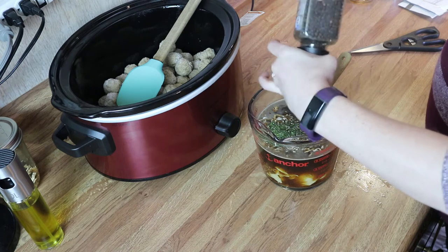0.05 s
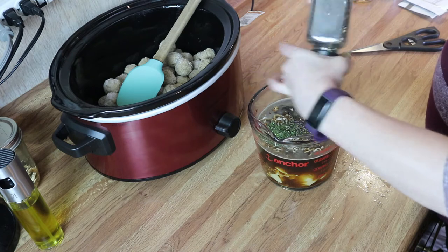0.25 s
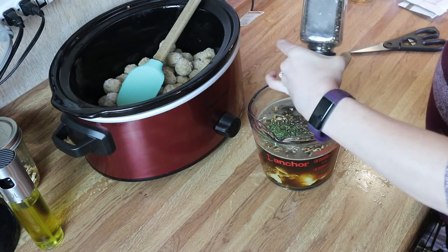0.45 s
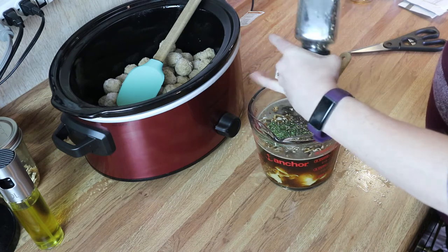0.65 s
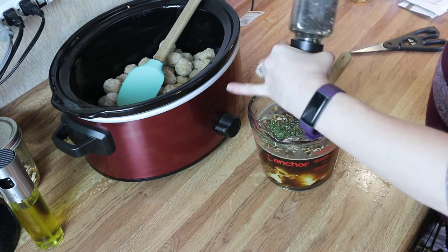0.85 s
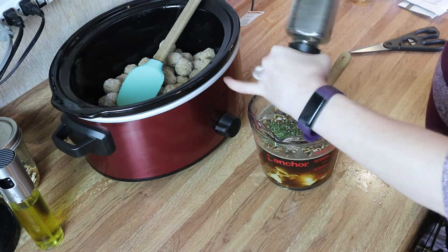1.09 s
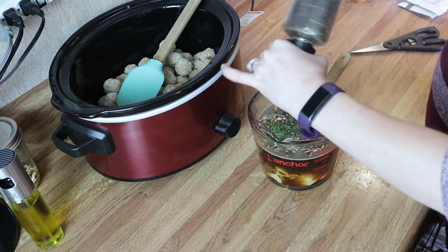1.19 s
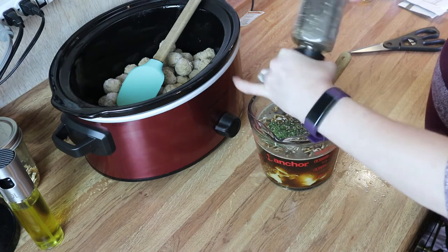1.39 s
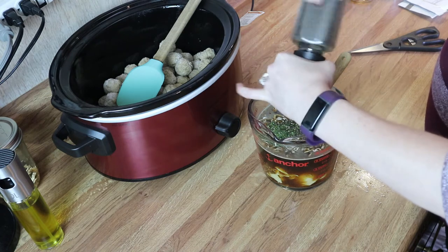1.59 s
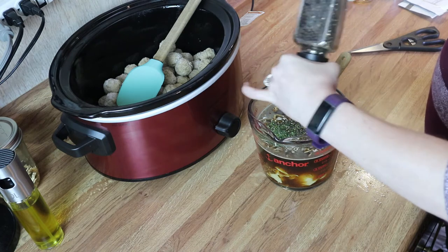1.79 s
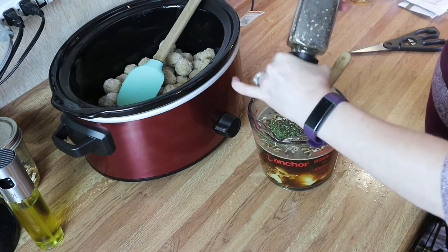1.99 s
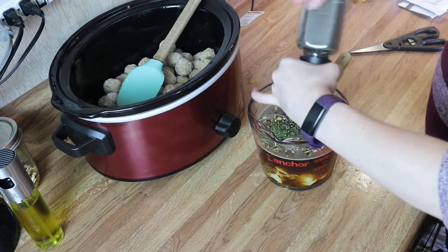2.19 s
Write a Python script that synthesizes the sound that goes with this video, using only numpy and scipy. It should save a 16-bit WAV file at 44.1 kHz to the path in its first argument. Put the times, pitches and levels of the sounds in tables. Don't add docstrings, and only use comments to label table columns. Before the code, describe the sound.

A plastic pepper grinder, close up in a small kitchen. A faint rasp and ticks lead to a loud double crunch at 0.2 s and a lone crack near 0.35. After a pause with one bright click at 0.65, a long crackling grind runs from 1.0 to 1.4. Lighter scraping follows at 1.5, harder cracks from 1.7 to 2.0, then a faint closing scrape. Low hum and air dip after loud cracks.

```python
import sys
import numpy as np
from scipy import signal
from scipy.fft import rfft, irfft, next_fast_len
from scipy.io import wavfile
from scipy.ndimage import uniform_filter1d, map_coordinates

SR = 44100
rng = np.random.default_rng(int(sys.argv[2]) if len(sys.argv) > 2 else 0)


def wav_record(signal):
    frames = np.transpose(np.atleast_2d(signal))
    bounded = np.clip(frames, -1, 1)
    quanta = np.round(bounded * 32767).astype(np.int16)
    wavfile.write(sys.argv[1], SR, quanta)


def voltage_ratio(level):
    return 10 ** (np.asarray(level, float) / 20)


N = 99225


def unit(x):
    return x / np.sqrt(np.mean(x ** 2) + 1e-20)


def along(points, hz):
    f, value = np.transpose(points)
    return np.interp(np.log(hz + 1), np.log(f + 1), value)


def filtered(x, response):
    m = next_fast_len(x.shape[-1] + 8192)
    spectrum = rfft(x, m) * response(np.fft.rfftfreq(m, 1 / SR))
    return irfft(spectrum, m)[..., :x.shape[-1]]


def ring(f, hz, width):
    return 1j * f * width / (hz * hz - f * f + 1j * f * width)


def swell(t, hz, peak_s):
    u = np.clip(t, 0, 1) / (peak_s + 1e-4)
    return u * np.exp((1 - u ** 2) / 2) * np.sin(2 * np.pi * (hz * t + rng.random()))


# frequency in Hz, width in Hz, level in dB.
BODY_MODES = [(1110, 50, -14), (2310, 90, -10.5), (3120, 17, -1), (3780, 38, 2), (4360, 32, -2),
              (4810, 26, -1.5), (5490, 130, -5), (6020, 12, 2.5), (6600, 240, -33), (10820, 380, -1)]


def mill(f, levels_db):
    response = 1
    for (hz, width, db), extra_db in zip(BODY_MODES, levels_db):
        response = response + voltage_ratio(db + extra_db - 3.5) * ring(f, hz, 0.5 * width + 150)
    return response


# frequency in Hz, level in dB per Hz.
BREAK_COLOUR = [(180, -45), (300, -7), (814, -13), (1140, -8.5), (2840, -7.5), (4370, -5), (7570, -9.5),
                (10900, -12.5), (16000, -21)]


def crack(db, hz, tilt_db, ms):
    before = 64
    t = np.arange(2048) / SR - before / SR
    length = ms / 1000 + 1e-5
    rise = 1 - np.exp(-np.clip(t, 0, 1) / (0.18 * length))
    sag_db = 9 * np.clip(t / length, 0, 1)
    fade_db = 60 * np.clip(t - length, 0, 1) / 0.007
    splinter = rng.standard_normal(len(t)) * rise * voltage_ratio(-sag_db - fade_db)
    modes_db = rng.normal(0, 3.5, len(BODY_MODES))
    thin_db = max(tilt_db - 2.5, 0)
    own_ring_db = np.array([[0], [-6]])

    def colour(f):
        slope_db = np.where(f > 4000, tilt_db, 2 * thin_db)
        slope_db = slope_db * np.log2((f + 1) / 4000).clip(-1, None)
        low_cut = 1 / (1 + (963 / (f + 1)) ** 8)
        body = mill(f, modes_db) + voltage_ratio(own_ring_db) * ring(f, hz, hz / 5.5) ** 2
        return voltage_ratio(along(BREAK_COLOUR, f) + slope_db) * low_cut * body

    hit, send = filtered(np.array([splinter, t == 0]), colour)
    clean = min(0.003 / length, 1)
    tone = voltage_ratio(-9) * clean * swell(t, hz, 0.55 * length)
    hit = voltage_ratio(db) * (voltage_ratio(-1) * hit / abs(hit).max() + tone)
    send = send * np.linalg.norm(hit) / np.linalg.norm(send)
    return hit, voltage_ratio(0.99 * thin_db) * send


# start in seconds, peak in dB, own ring in Hz, brightness in dB per octave, break length in ms.
CRUNCH_HITS = [
    (.2017, -10, 3900, -5, 4),
    (.2101, 1, 4560, 2, 2.4),
    (.2145, -11, 4300, 1, 7),
    (.2255, -4.5, 4600, -7, 2.6),
    (.2308, -3, 4820, -2, 3),
    (.2358, -5, 4520, -8, 3.2),
]
STRAY_CORNS = [
    (0.125, -26, 6500, 8, 3),
    (0.157, -28, 11100, 6, 4),
    (0.167, -26, 2750, -4, 2.3),
    (0.3568, -4, 3150, -4.5, 1.8),
    (0.951, -41, 2500, -12, 3),
]
GRIND_CORNS = [(.99, -24, 4700, -4, 4), (1.0097, -7, 3050, -1, 2.2), (1.021, -21, 3050, -3, 6),
               (1.047, -26, 3800, -3, 5), (1.1415, -20, 2400, 0, 7), (1.1546, -3, 4300, -2, 2.5),
               (1.161, -11, 4200, -3, 5), (1.1675, -13, 4300, 0, 6), (1.184, -4, 4260, -6, 3.4),
               (1.2035, -2.5, 4260, -3, 3), (1.209, -11, 4240, -1, 7), (1.2218, -4, 4350, 2, 2.5),
               (1.2298, -4.5, 5600, -2, 3), (1.2438, -10, 4300, -4, 2.5), (1.2677, -12, 4500, -2, 2.5),
               (1.2712, -12, 4090, -3, 4), (1.2822, -8, 4270, 0, 2.2), (1.3016, -14, 4300, -4, 2.2),
               (1.314, -19, 4400, -6, 6), (1.3345, -15, 3900, -1, 6)]
CAP_SNAPS = [
    (0.3512, -10.5, 5730, 5, 2.6),
    (0.6507, -7, 5990, 5.5, 2),
    (1.7736, -8, 6000, 7, 2),
]
LATE_CORNS = [(1.5191, -15.5, 3730, 0, 1.8), (1.533, -19, 6030, -2, 2.5), (1.6303, -22.5, 2520, -10, 2.3),
              (1.6422, -23, 3120, -12, 3), (1.6645, -20, 2500, -4, 5.4), (1.678, -19, 4300, 0, 6.6),
              (1.6864, -9, 1810, -4, 2), (1.695, -11, 3800, -2, 4), (1.7905, -12, 4220, -1, 3.5),
              (1.7965, -10, 3500, -4, 3), (1.8048, -2, 4090, -1, 2.6), (1.8085, -12, 3600, -1, 6),
              (1.9375, -1, 3745, -1, 3.6), (1.9548, -15.5, 3190, -6, 4), (1.9722, -8, 4100, 0, 2.6),
              (2.0318, -16, 3730, -6, 2.6)]


def cracks():
    out = np.zeros((2, N + SR))
    for s, *how in [*CRUNCH_HITS, *STRAY_CORNS, *GRIND_CORNS, *CAP_SNAPS, *LATE_CORNS]:
        hit, send = crack(*how)
        start = round(s * SR) - 64
        out[:, start:start + len(hit)] += [hit, send]
    return out[:, :N]


# start in seconds, peak in dB, lower ring in Hz, upper ring in Hz, swell in ms.
BODY_RINGS = [(.2017, -23, 2600, 6800, 1.5), (.2101, -16, 990, 3790, 1), (.2101, -13, 2280, 6980, 1.3),
              (.2165, -21, 2110, 5600, 1.8), (.2253, -19, 1080, 2600, 1), (.2308, -20, 1080, 2540, 1),
              (.3561, -27, 1500, 8600, 1.4), (1.0097, -15, 4200, 3700, 1.2), (1.1835, -21, 1080, 3010, 1.2),
              (1.2035, -17, 1160, 1810, 1.4), (1.2035, -15, 2450, 4870, 1.6), (1.211, -24, 1850, 5600, 1.2),
              (1.2298, -22, 1120, 4300, 1.4), (1.6864, -20, 1160, 3900, 1.1), (1.694, -27, 600, 2020, 1.6),
              (1.7738, -24, 2500, 4500, 1.2), (1.7965, -27, 1335, 4200, 2.2),
              (1.8051, -20, 1080, 2240, 2.2), (1.8125, -21, 2150, 4500, 1.5), (1.824, -25, 2240, 4300, 2.4),
              (1.9375, -16, 1160, 2500, 2), (1.9375, -14, 5510, 6850, 1.5), (1.9719, -20, 5200, 6700, 1.6)]


def chimes():
    out, t = np.zeros(N + SR), np.arange(1024) / SR
    for s, db, low_hz, high_hz, ms in BODY_RINGS:
        pair = swell(t, low_hz, ms / 1000) + swell(t, high_hz, ms / 1000)
        out[round(s * SR):][:len(t)] += voltage_ratio(db) * pair
    return out[:N]


# start in seconds, peak in dB, pitch in Hz.
BODY_KNOCKS = [(0.207, -27, 595), (0.23, -38.5, 600), (0.354, -32, 495), (1.02, -30.5, 574),
               (1.152, -25, 445), (1.202, -26, 595), (1.31, -31, 603), (1.334, -33.5, 670),
               (1.516, -28.5, 617), (1.684, -26.5, 500), (1.794, -25.5, 406), (1.804, -29.5, 450),
               (1.969, -30.5, 650)]


def thuds():
    out, t = np.zeros(N + SR), np.arange(1024) / SR
    for s, db, hz in BODY_KNOCKS:
        push = rng.standard_normal(len(t)) * voltage_ratio(-60 * t / 0.04)
        knock = filtered(push, lambda f: ring(f, hz, 690) ** 2)
        out[round(s * SR):][:len(t)] += voltage_ratio(db) * knock / abs(knock).max()
    return out[:N]


# time in seconds, level in dB, brightness in dB.
TWIST_FORCE = [
    [(.035, -45, -6), (.055, -42, -1), (.085, -32.5, 3.5), (.11, -47.5, 6.5), (.127, -41, 6), (.15, -44, 4),
     (.17, -45, 5.5), (.199, -31, 10), (.25, -47, 16), (.3, -63, 20)],
    [(.945, -85, -16), (.962, -59, 4), (.972, -35, -5.5), (.992, -42.5, 13), (1.005, -26.5, -5),
     (1.05, -34, -3.5), (1.11, -61, 3)],
    [(1.11, -47, 6), (1.147, -23.5, -9), (1.19, -44, 11), (1.27, -25.5, -8), (1.315, -33.5, -2.5),
     (1.35, -26.5, -7.5), (1.44, -63.5, 14.5)],
    [(1.44, -46, -9), (1.5, -38.5, 0), (1.535, -34.5, 1), (1.57, -36, 3.5), (1.64, -57, 7)],
    [(1.64, -47, -2), (1.67, -31, -2), (1.71, -26.5, -4.5), (1.745, -52, 8.5), (1.785, -25.5, 5.5),
     (1.83, -33.5, -8), (1.88, -36.5, 1.5), (1.93, -48.5, 9.5)],
]
LATE_TWIST_FORCE = [
    [(1.94, -19.5, -7), (1.99, -37, 3.5), (2.05, -42, -7), (2.13, -55.5, -0.5)],
    [(2.13, -61, -1), (2.18, -45, 0), (2.25, -37, 4.5)],
]
# frequency in Hz, level in dB per Hz.
RASP_COLOUR = [(530, -63.5), (900, -11.5), (1410, -10), (1680, -12), (2170, -8), (4680, -3), (7140, -9.5),
               (12000, -11), (16000, -17)]


def rasp():
    t = np.arange(N) / SR
    grains_per_s = 400
    spikes = (rng.random(N) < grains_per_s / SR) * voltage_ratio(2 * rng.exponential(1, N).clip(0, 2))
    clumps = voltage_ratio(3.4 * map_coordinates(rng.standard_normal(200), [t * 80]))
    grains = unit(signal.lfilter([1], [1, -.93], spikes))
    grit = clumps * rng.standard_normal(N) * (1 + voltage_ratio(-11) * grains)
    modes_db = np.full(len(BODY_MODES), -1.5)
    grit = unit(filtered(grit, lambda f: voltage_ratio(along(RASP_COLOUR, f)) * mill(f, modes_db)))
    bright = filtered(grit, lambda f: 1 / (1 + (6500 / (f + 1)) ** 4))
    force, shine = np.zeros(N), np.ones(N)
    for rows in [*TWIST_FORCE, *LATE_TWIST_FORCE]:
        s, db, bright_db = np.transpose(rows)
        on = (t >= s[0]) & (t < s[-1])
        force[on] = voltage_ratio(np.interp(t[on], s, db))
        shine[on] = voltage_ratio(np.interp(t[on], s, bright_db))
    return uniform_filter1d(force, size=200) * (grit + (shine - 1) * bright)


# frequency in Hz, t60 in seconds.
KITCHEN_DECAY = [(500, 0.25), (2000, 0.13), (5000, 0.088), (10000, 0.087), (16000, 0.06)]


def kitchen(x):
    out, part = np.zeros(N + SR), SR // 20
    for start in range(0, N, part):
        hz, t, z = signal.stft(rng.standard_normal(SR // 2), SR, nperseg=256)
        fall_db = -60 * t / along(KITCHEN_DECAY, hz)[:, None]
        decay = voltage_ratio(fall_db) + voltage_ratio(-13 + fall_db / 5.37)
        tail = signal.istft(z * decay, SR, nperseg=256)[1]
        wet = signal.fftconvolve(x[start:start + part], tail / np.linalg.norm(tail))
        out[start + 100:][:len(wet)] += wet
    return out[:N]


# multiple of the mains frequency, level in dB rms.
MAINS_HUM = [(1, -53), (2, -49)]
# frequency in Hz, level in dB rms.
FAN_TONES = [(172, -59), (202, -59)]
# frequency in Hz, level in dB per Hz.
AIR_COLOUR = [(40, -14.5), (100, -7.5), (160, 2), (240, -4), (320, 1), (1480, -12), (1720, -17),
              (16000, -36)]
# start in seconds, drop in dB.
GAIN_DROPS = [
    (0.211, 7),
    (1.2, 5.5),
    (1.8, 3),
    (1.94, 5),
]


def room_tone():
    t = np.arange(N) / SR
    mains_hz, recover_s = 60, 0.41
    hum = np.zeros(N)
    for hz, db in [*FAN_TONES, *[(k * mains_hz, db) for k, db in MAINS_HUM]]:
        hum += np.sqrt(2) * voltage_ratio(db) * np.sin(2 * np.pi * (hz * t + rng.random()))
    air = voltage_ratio(-45.5) * unit(filtered(rng.standard_normal(N), lambda f: voltage_ratio(along(AIR_COLOUR, f))))
    drop_db = sum(db * (t > s) * np.exp(-abs(t - s) / recover_s) for s, db in GAIN_DROPS)
    return voltage_ratio(-uniform_filter1d(drop_db, size=400)) * (hum + air)


def scene():
    hits, spread = cracks()
    rub = rasp() + thuds()
    rings = chimes()
    wet = kitchen(voltage_ratio(-8.5) * spread + voltage_ratio(-6.5) * rub + voltage_ratio(-13) * rings)
    return (hits + rub + rings + wet + room_tone())[None]


def roll_off(x):
    return signal.sosfilt(signal.butter(12, 16450, fs=SR, output="sos"), x)


def record(dry):
    top_hz = 15800
    limited = filtered(dry, lambda f: 1 / (1 + (f / top_hz) ** 120))
    mix = np.clip(limited, -1, 1)
    return roll_off(mix)


dry = scene()
out = record(dry)
wav_record(out)
```